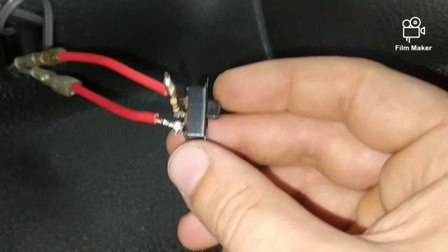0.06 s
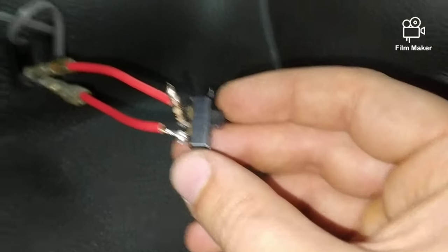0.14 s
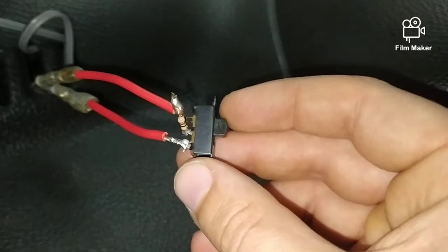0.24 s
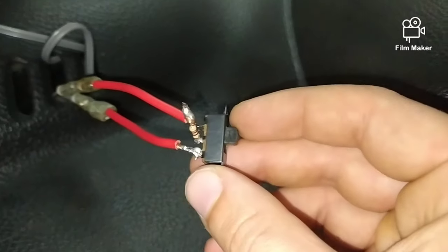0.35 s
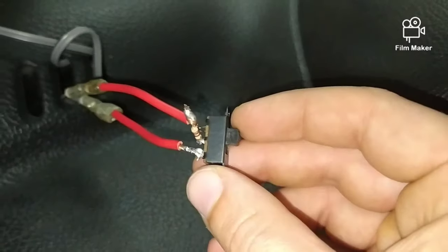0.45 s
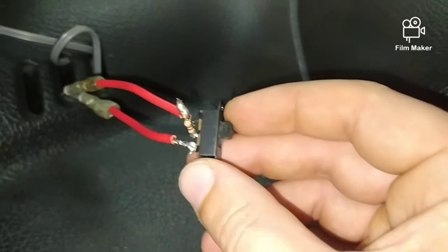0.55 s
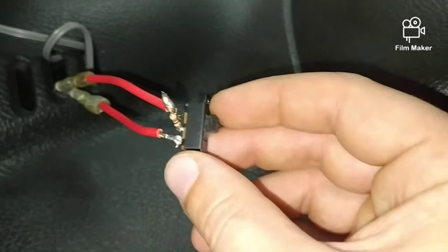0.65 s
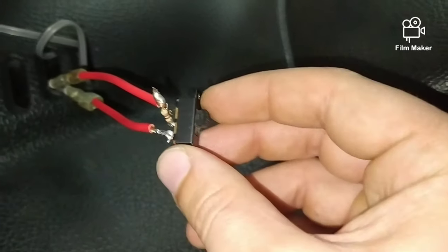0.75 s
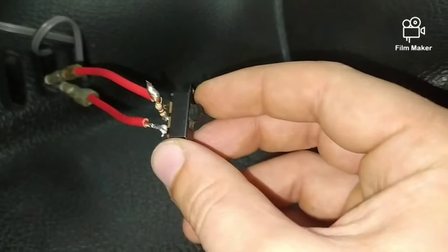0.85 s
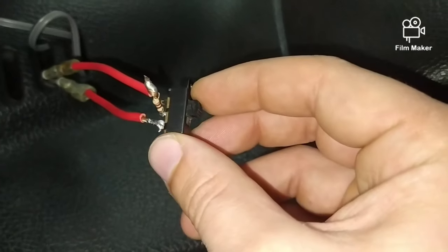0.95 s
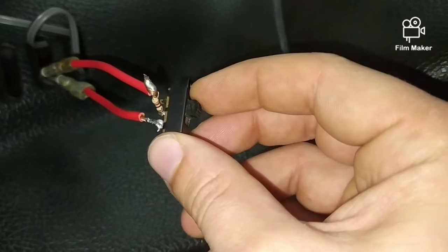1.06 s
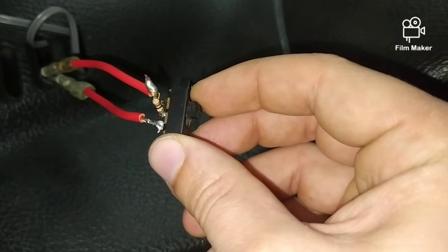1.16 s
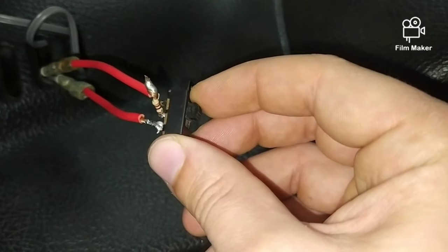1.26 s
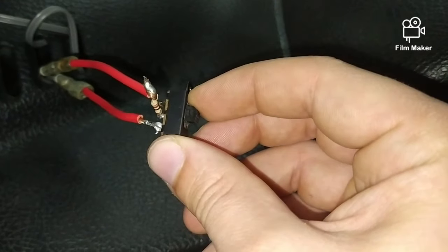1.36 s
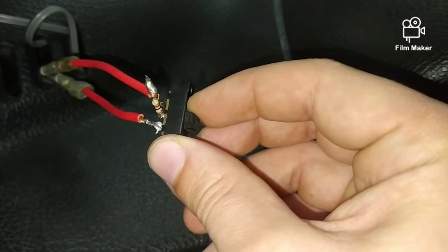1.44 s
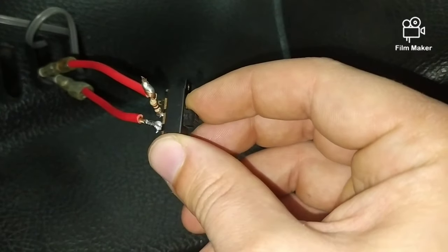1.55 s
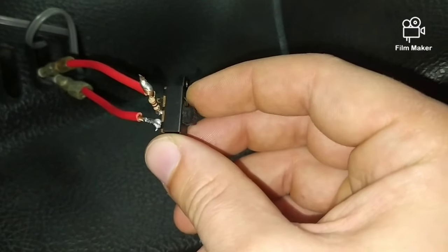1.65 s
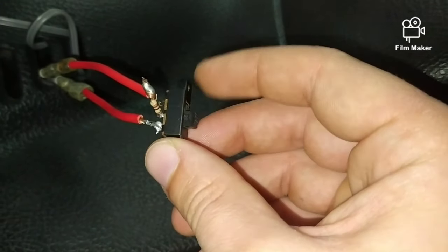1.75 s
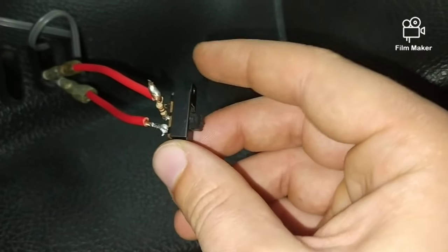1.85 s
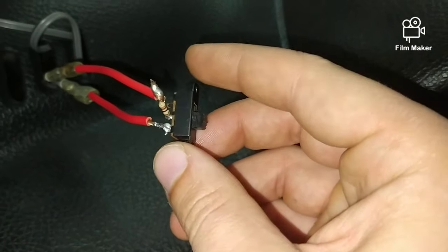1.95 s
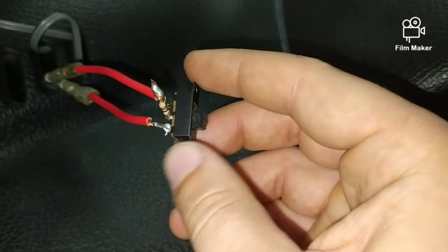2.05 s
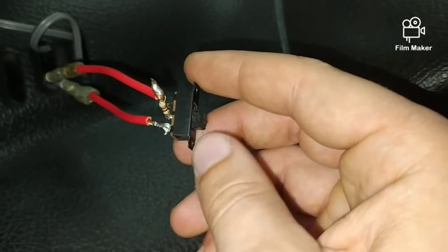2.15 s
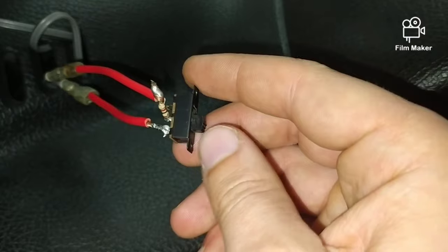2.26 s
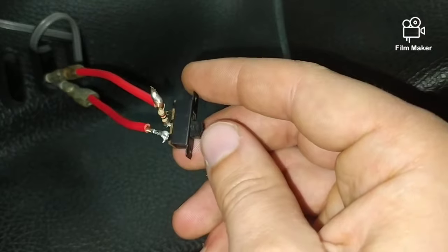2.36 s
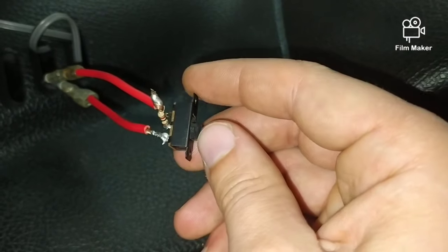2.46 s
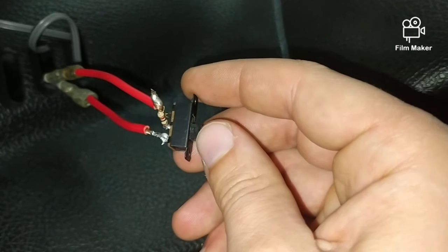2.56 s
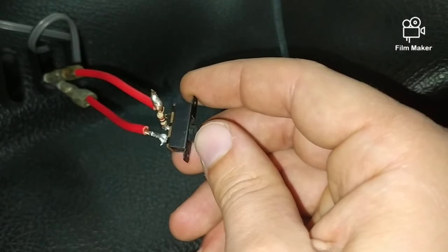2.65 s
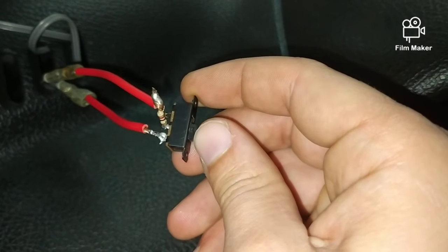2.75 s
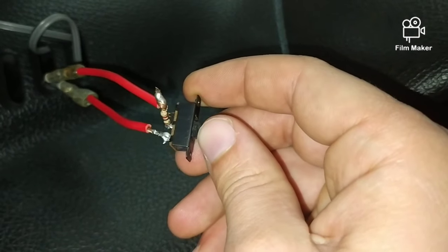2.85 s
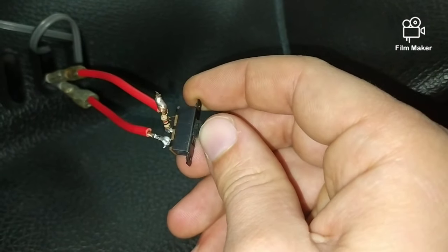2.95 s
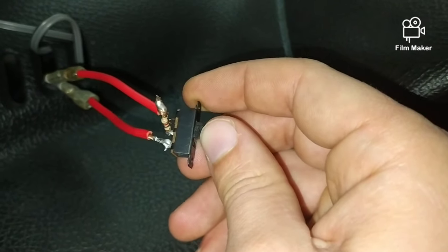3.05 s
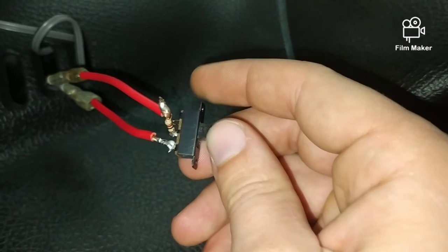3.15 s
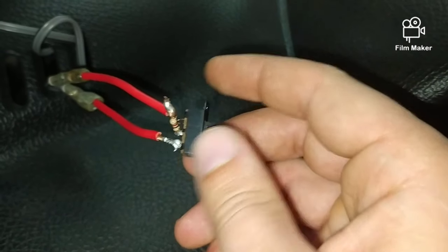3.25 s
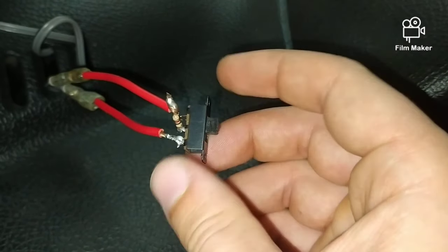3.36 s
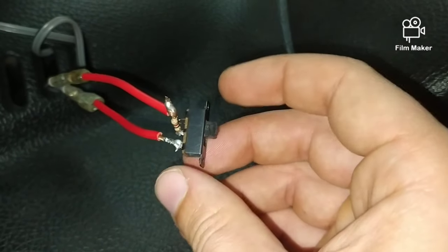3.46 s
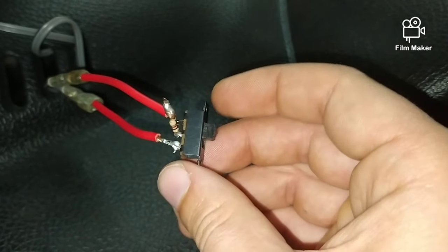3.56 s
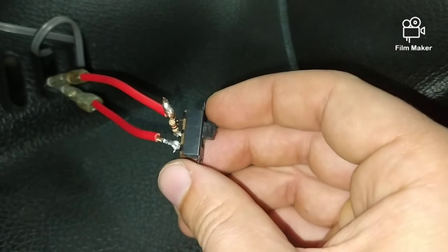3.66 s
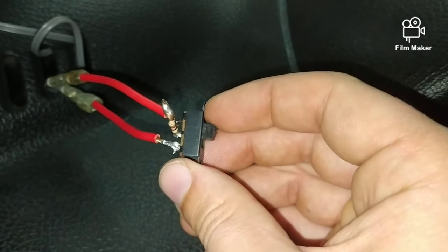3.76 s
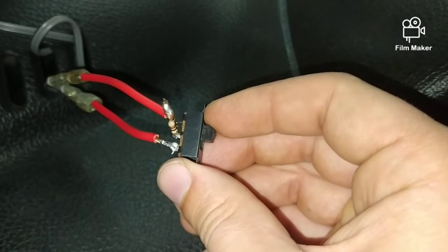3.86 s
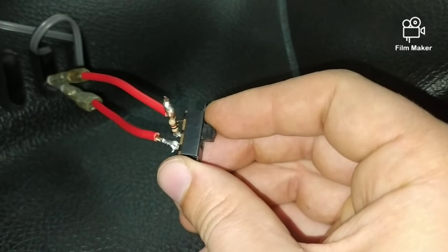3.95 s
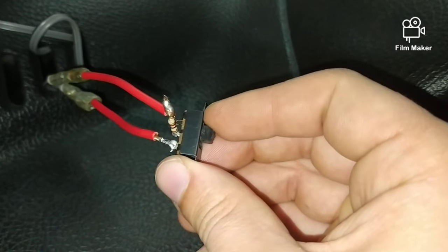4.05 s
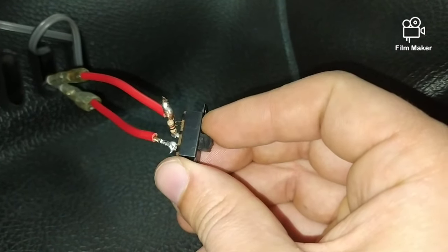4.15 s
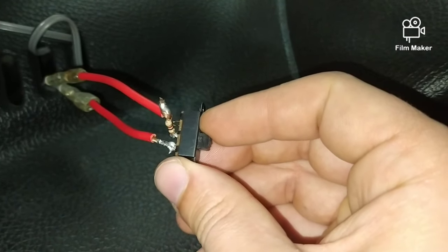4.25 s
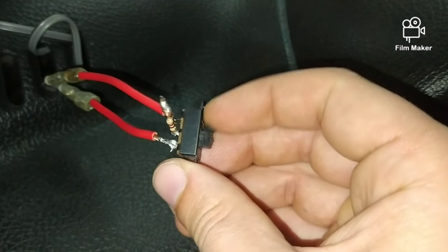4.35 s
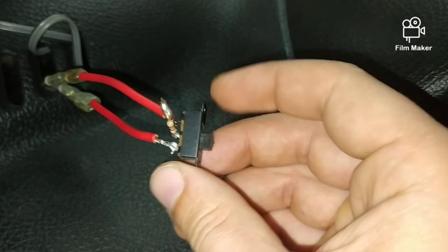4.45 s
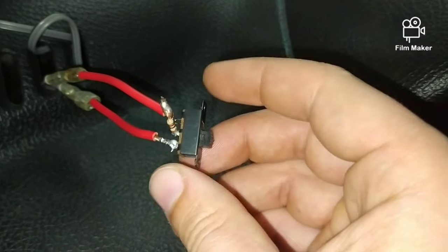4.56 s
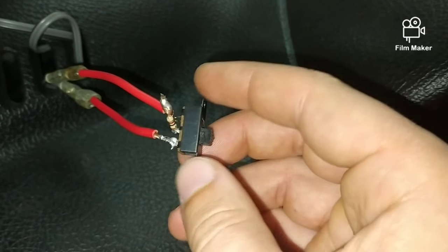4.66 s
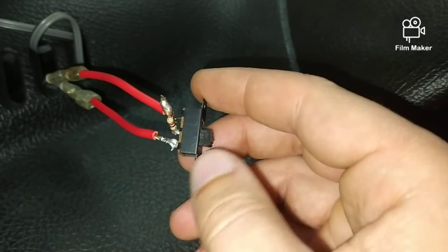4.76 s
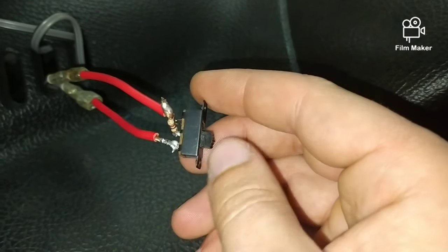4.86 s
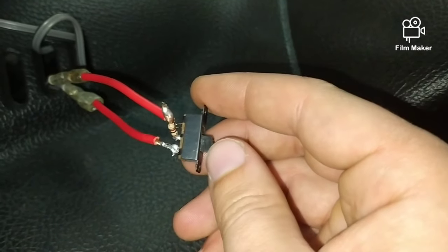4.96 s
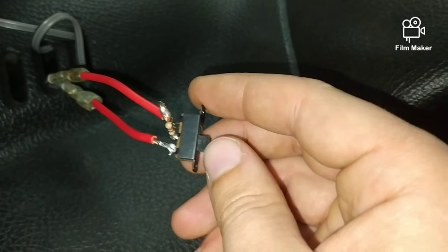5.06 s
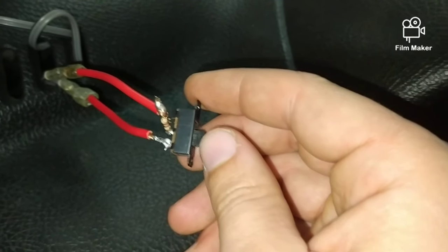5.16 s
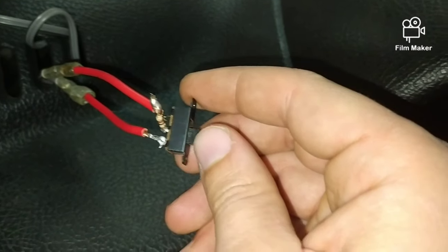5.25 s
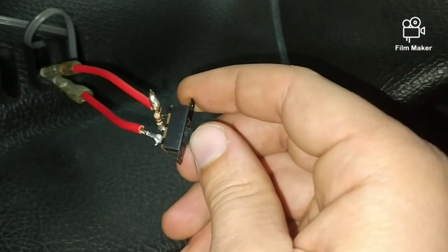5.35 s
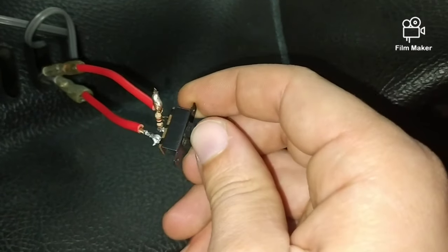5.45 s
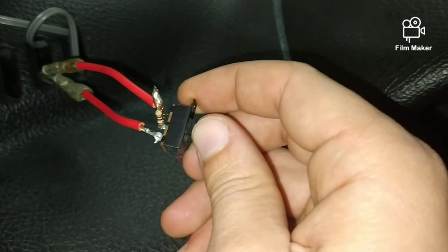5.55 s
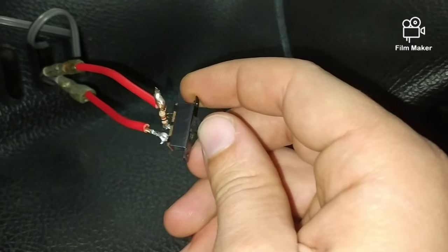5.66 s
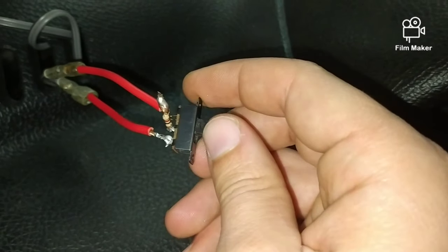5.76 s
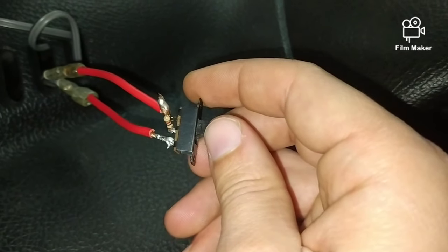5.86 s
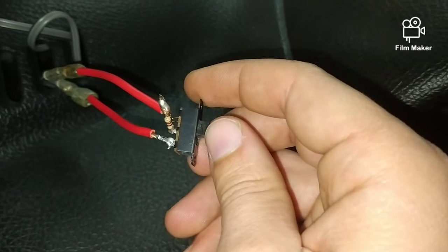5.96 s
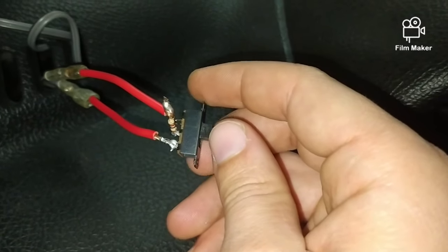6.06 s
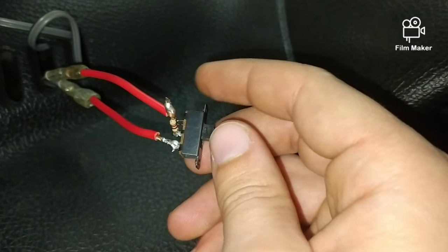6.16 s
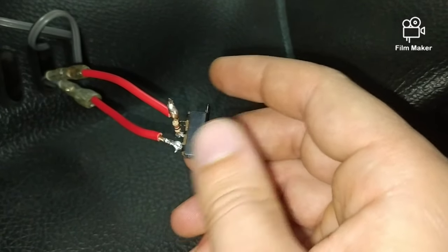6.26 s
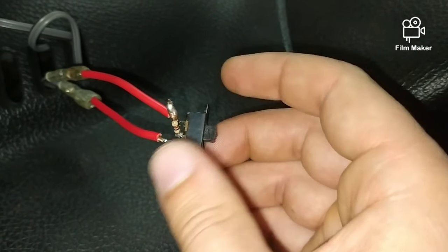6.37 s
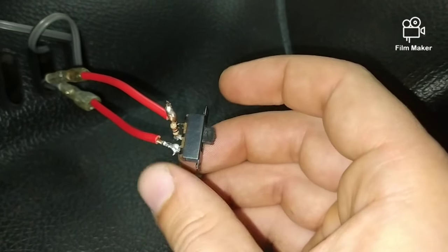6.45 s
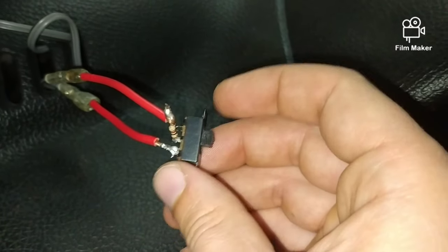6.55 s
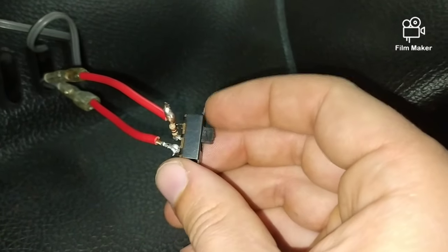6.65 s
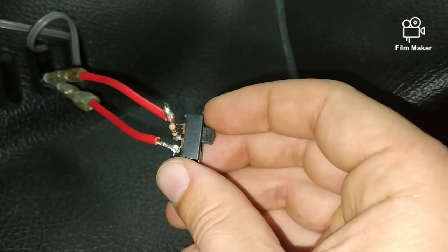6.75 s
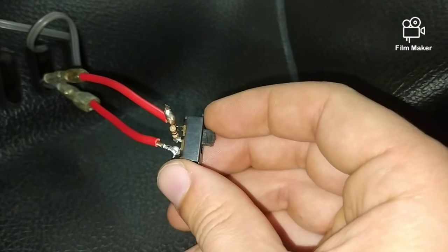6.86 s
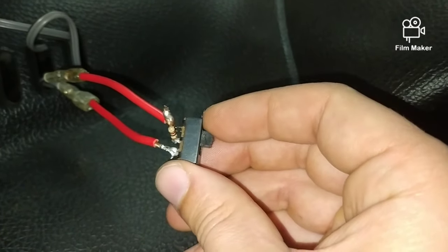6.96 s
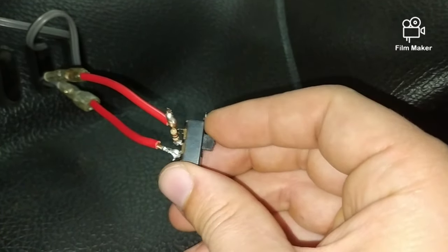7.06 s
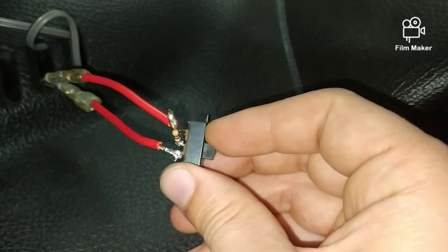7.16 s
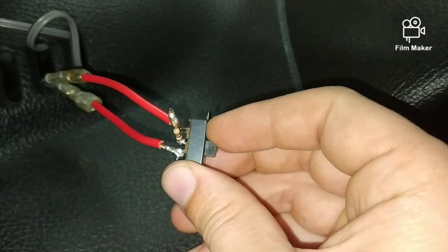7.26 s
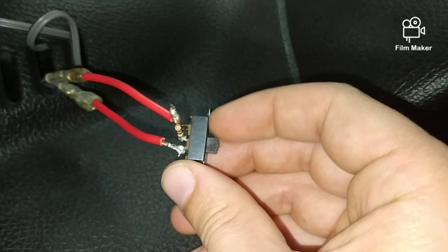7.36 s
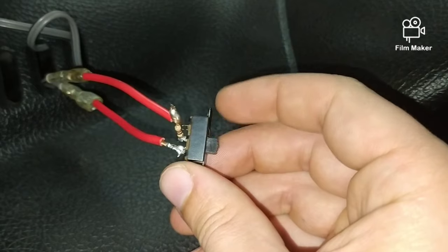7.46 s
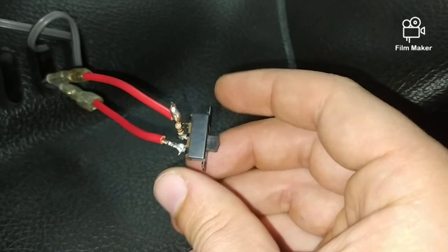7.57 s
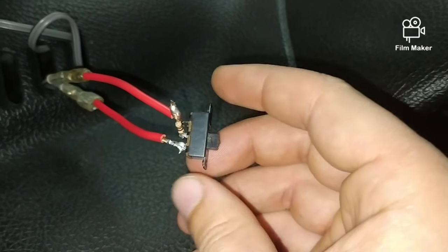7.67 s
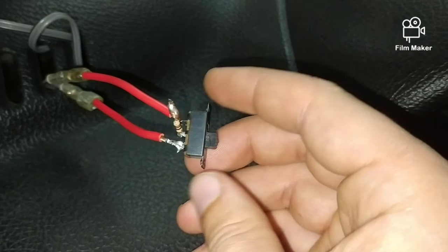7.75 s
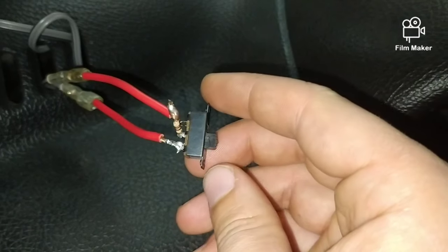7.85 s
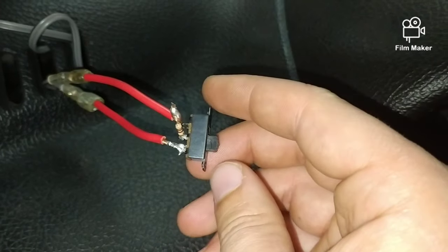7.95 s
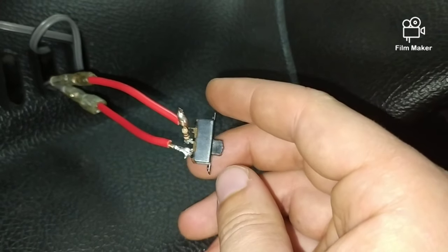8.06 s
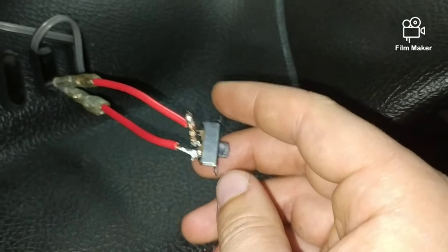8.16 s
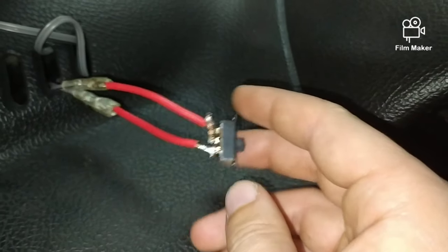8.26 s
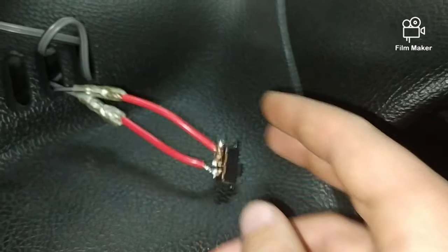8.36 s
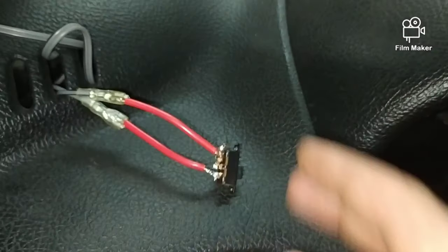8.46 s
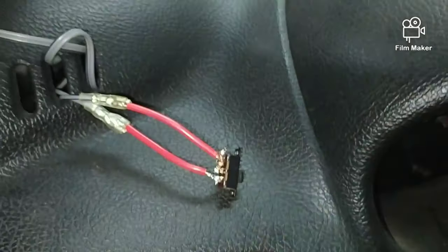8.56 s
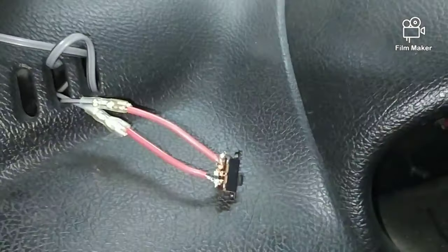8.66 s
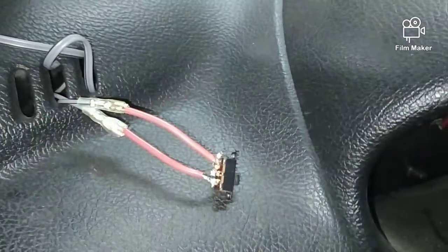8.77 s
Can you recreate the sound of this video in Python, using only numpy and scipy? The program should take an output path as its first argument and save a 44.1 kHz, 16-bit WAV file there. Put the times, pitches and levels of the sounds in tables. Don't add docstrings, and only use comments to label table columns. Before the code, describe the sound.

A small slide switch snaps back and forth close up, with faint sleeve rustle and crickets, before dropping with a knock against hollow plastic trim.

```python
import sys
import numpy as np
from scipy import signal
from scipy.fft import rfft, irfft, next_fast_len
from scipy.io import wavfile
from scipy.ndimage import uniform_filter1d

SR = 44100
rng = np.random.default_rng(int(sys.argv[2]) if len(sys.argv) > 2 else 0)


def inscribe(sig):
    pcm = np.round(np.clip(np.atleast_2d(sig).T, -1, 1) * 32767)
    wavfile.write(sys.argv[1], SR, pcm.astype(np.int16))


def gain_from_db(level_db):
    decades = np.asarray(level_db, float) / 20
    return 10 ** decades


N = 388521
SIDES = np.array([[1], [-1]])
BLOW_T = np.arange(8192) / SR
LEAD_S = 0.006
SEAT_PAN_DB, SKIN_PAN_DB = -1, -10


def shape(x, gain):
    n = next_fast_len(x.shape[-1], real=True)
    hz = np.maximum(np.arange(n // 2 + 1) * SR / n, 1)
    return irfft(rfft(x, n) * gain(hz), n)[..., :x.shape[-1]]


def colour(table):
    f, db = np.transpose(table)
    return lambda hz: gain_from_db(np.interp(np.log(hz), np.log(f), db))


def peak(centre_hz, width_hz):
    return lambda hz: 1 / (1 + 1j * (hz ** 2 - centre_hz ** 2) / (hz * width_hz))


def causal(gain):
    def with_phase(hz):
        ceps = irfft(np.log(gain(hz)))
        ceps[1:len(hz) - 1] *= 2
        ceps[len(hz):] = 0
        return np.exp(rfft(ceps))
    return with_phase


def unit(x):
    return x / np.sqrt(np.mean(x ** 2, axis=-1, keepdims=True))


def stereo_noise():
    return rng.standard_normal((2, N))


def walk(rate_hz):
    return unit(shape(stereo_noise(), lambda hz: 1 / (1 + (hz / rate_hz) ** 2)))


def gesture(s, rise_s, hold_s, fade_db_s):
    power, i = np.zeros(N), int(s * SR)
    late = np.arange(min(N - i, 2 * SR)) / SR
    rise = np.sin(np.pi / 2 * np.minimum(late / rise_s, 1)) ** 4
    fade = gain_from_db(-2 * fade_db_s * np.maximum(late - rise_s - hold_s, 0))
    power[i:i + len(late)] = rise * fade
    return power


# (pitch [Hz], level [dB per Hz])
HISS_COLOUR = [(12, 6.5), (25, 3), (82, -10), (230, -16.5), (800, -23.5), (2600, -28), (3200, -31.5),
               (5400, -33.5), (10700, -30), (11100, -40), (13000, -34.5), (13400, -41.5), (15800, -41.5),
               (16200, -78)]
# (pitch [Hz], left minus right [dB])
HISS_BALANCE = [(60, 0.5), (110, 0), (200, -1), (380, 2.5), (700, 2), (1290, -0.5), (2380, -1.5),
                (4400, -2), (8120, -2), (15000, -6.5)]
# (pitch [Hz], width [Hz], level [dB])
NIGHT_HUMPS = [(199.5, 52, -82), (320, 56, -90), (9860, 40, -91.5), (10000, 100, -91), (10460, 100, -93)]


def hiss(level_db=-65.5):
    f, pan_db = np.transpose(HISS_BALANCE)

    def port_gain(hz):
        return colour(HISS_COLOUR)(hz) * gain_from_db(SIDES * np.interp(hz, f, pan_db) / 2)

    def hump_gain(hz):
        return np.sqrt(sum((gain_from_db(db) * unit(abs(peak(f, w)(hz)) ** 2)) ** 2 for f, w, db in NIGHT_HUMPS))

    floor = shape(stereo_noise(), port_gain)
    floor = floor / np.sqrt(np.mean(floor ** 2)) * gain_from_db(level_db)
    return floor + shape(stereo_noise(), hump_gain)


# (pitch [Hz], width [Hz], level [dB])
WING_TONES = [
    (4430, 110, -1),
    (4544, 90, 2.5),
]
# (time [s], level [dB])
CHORUS_LEVEL = [(0, -77), (1.1, -82), (1.7, -81.5), (3.2, -82), (6, -82), (8.81, -82.5)]


def crickets(strokes_hz=43, depth=0.22, pan_db=-11):
    chirp_s, first_chirp_s, chirp_share = 0.458, 0.27, 0.58
    gap_db, edge, scatter_db = -13.5, 0.38, 0.93
    song = 0
    for f, w, db in WING_TONES:
        song = song + gain_from_db(db) * unit(shape(stereo_noise(), lambda hz: peak(f, w)(hz) ** 2))
    stroke_phase = np.cumsum(strokes_hz * (1 + 0.15 * walk(5.7)[0])) / SR
    throb = 1 + depth * np.sin(2 * np.pi * stroke_phase)
    t = np.arange(N) / SR
    beat = np.cos(2 * np.pi * (t - first_chirp_s) / chirp_s) - np.cos(np.pi * chirp_share)
    swell_db = gap_db / (1 + np.exp(beat / edge)) + scatter_db * walk(2.0)[0]
    swell_db = swell_db + np.interp(t, *np.transpose(CHORUS_LEVEL))
    return unit(song) * throb * gain_from_db(swell_db + SIDES * pan_db / 2)


REST_LEVEL = (-81.5, -83, -92, -91, -89)
STROKE_SHARE = (-23.5, -6.5, -7.5, -1.5, -2.5)
# (time [s], level [dB], rise [s], fade [dB per s], brightness [dB])
SLEEVE_STROKES = [(.645, -78, 0.023, 60, -1.5), (1.595, -64.5, 0.026, 68, -5.5),
                  (2.565, -75.5, 0.018, 39, -3), (2.915, -68, 0.02, 120, -4), (3.01, -66.5, 0.029, 77, -7),
                  (3.215, -75.5, 0.012, 80, -1), (4.244, -64, 0.028, 72.5, -5.5),
                  (5.579, -68.5, 0.041, 70, -4.5), (6.705, -77.5, 0.017, 62, -3.5),
                  (7.215, -64.5, 0.04, 72, -6), (8.27, -74, 0.025, 60.5, 3.5),
                  (8.324, -68, 0.043, 601.5, 10.5), (8.46, -65.5, .02, 84.5, -8.5),
                  (8.56, -74.5, 0.044, 14, 2.5)]
# (time [s], hold [s], creak level [dB], bass minus creak [dB])
SEAT_SHIFTS = [(2.774, 0.11, -65, -5), (2.99, 0.04, -70.5, -7), (3.988, .01, -76.5, 1),
               (4.172, .005, -76, 4), (5.505, .02, -74.5, 2.5), (6.567, .005, -80, -0.5),
               (6.707, .08, -74.5, -3), (6.897, 0.19, -82.5, 9), (7.136, 0.26, -68.5, 2.5),
               (7.45, .1, -82, -4), (8.224, .04, -72.5, -9.5), (8.432, 0.029, -62, -4.5),
               (8.655, .1, -71.5, 2.5)]


def movement():
    stir_db = 2 * walk(5)[[0, 0, 1, 1, 1]]
    power = gain_from_db(2 * (np.array(REST_LEVEL)[:, None] + stir_db))
    for s, db, rise_s, fade_db_s, bright_db in SLEEVE_STROKES:
        share_db = db + np.array(STROKE_SHARE) + bright_db * (np.arange(5) == 4)
        power += gain_from_db(2 * share_db)[:, None] * gesture(s, rise_s, 0.027, fade_db_s)
    for s, hold_s, db, bass_db in SEAT_SHIFTS:
        seat_db = np.array([[db + bass_db], [db]])
        power[:2] += gain_from_db(2 * seat_db) * gesture(s, 0.04, hold_s, 109)
    return power


# (pitch [Hz], width [Hz], level [dB])
PORT_RINGS = [
    (9320, 2400, 1.5),
    (8877, 700, 9.5),
]


def ports(x):
    return shape(x, lambda hz: np.array([1 + gain_from_db(db) * peak(f, w)(hz) for f, w, db in PORT_RINGS]))


# (low edge [Hz], high edge [Hz], left minus right [dB], likeness of ports [0-1],
# flicker [dB], hump pitch [Hz], hump level [dB])
CLOTH_BANDS = [
    (132, 210, 0, 0.4, 0.5, 195, 5.5),
    (237, 520, -2, 0.4, 1, 320, 3.5),
    (630, 650, -2, .2, 2.5, 900, 2),
    (1320, 1800, -10, 0, 0.5, 2120, 3),
    (4260, 6600, -8.5, .1, 0.9, 8400, -5),
]


def cloth():
    out = 0
    for power, band_settings in zip(movement(), CLOTH_BANDS):
        low_hz, high_hz, pan_db, like, flicker_db, hump_hz, hump_db = band_settings
        noise = rng.standard_normal((3, N))
        like = np.clip(like, 0, 1)
        pair = np.sqrt(like) * noise[2] + np.sqrt(1 - like) * noise[:2]

        def band_gain(hz):
            edges = 1 / np.sqrt((1 + (low_hz / hz) ** 6) * (1 + (hz / high_hz) ** 6))
            return edges * (1 + gain_from_db(hump_db) * peak(hump_hz, hump_hz / 8)(hz))

        band = ports(shape(pair, band_gain))
        band = band / np.sqrt(np.mean(band ** 2))
        out = out + band * np.sqrt(power) * gain_from_db(flicker_db * walk(29)[0] + SIDES * pan_db / 2)
    return out


# (time [s], fade [s], pitch [Hz], width [Hz], level [dB])
RESONANT_RUBS = [
    (.675, .087, 1885, 80, -75.5),
    (2.815, .12, 470, 200, -70.5),
    (2.885, 0.096, 310, 70, -61.5),
    (3.235, 0.091, 2205, 150, -73.5),
    (4.73, 0.027, 12500, 2510, -79),
    (7.93, 0.091, 49.3, 49.8, -65.5),
    (8.355, 0.033, 2500, 300, -64.5),
    (8.297, 0.018, 348, 89.6, -59),
]


def rubs():
    out = np.zeros((2, N))
    for s, fade_s, hz, width_hz, db in RESONANT_RUBS:
        low = hz < 600
        pan_db = SEAT_PAN_DB if low else SKIN_PAN_DB
        i = np.arange(int((s - 0.2) * SR), min(N, int((s + 0.5) * SR)))
        late = (i / SR - s) / fade_s
        swell = np.exp(-np.where(late < 0, 5 * late, late) ** 2)
        noise = rng.standard_normal((2, SR))
        if low:
            noise[1] = noise[0]
        tone = unit(shape(noise, lambda f: peak(hz, width_hz)(f) ** 2))[:, :len(i)]
        out[:, i] += gain_from_db(db + SIDES * pan_db / 2) * swell * tone
    return out


def burst(delay_s, tau_s):
    late = BLOW_T - LEAD_S - delay_s
    return rng.standard_normal((2, len(BLOW_T))) * (BLOW_T >= LEAD_S + delay_s) * np.exp(-np.maximum(late, 0) / tau_s)


def add(out, s, sound, db, pan_db):
    i = int((s - LEAD_S) * SR)
    part = sound[:, :N - i] / np.sqrt(np.sum(sound ** 2, axis=-1, keepdims=True) / 25)
    out[:, i:i + part.shape[1]] += part * gain_from_db(db + SIDES * pan_db / 2)


# (time [s], energy level [dB], pitch [Hz], left minus right [dB], brightness [dB])
FINGER_TICKS = [(0.994, -59.5, 563, -1, -5), (1.329, -65, 795, -4, -22), (2.225, -60, 370, 1, -17),
                (2.652, -63, 700, -1.5, -7), (2.724, -65, 393, 3, -13), (3.194, -61, 775, -1.0, -19),
                (3.931, -57.5, 772, -1, -24), (4.031, -62.5, 385, -8, -21), (5.417, -59, 800, 0, -15),
                (6.579, -61.5, 301, -1, -18), (6.719, -64, 364, -7, -16), (7.029, -65, 770, 6, -15),
                (8.253, -56.5, 297, -3, -22), (8.295, -61, 363, -6, -13)]


def fingers():
    out = np.zeros((2, N))
    for s, db, hz, pan_db, bright_db in FINGER_TICKS:
        dull = unit(shape(burst(0, 0.0064), lambda f: peak(hz, 600)(f) ** 2))
        edge = unit(shape(burst(0, 0.0015), lambda f: peak(2200, 2600)(f) ** 2))
        add(out, s, dull + gain_from_db(bright_db) * edge, db + 7.5, pan_db)
    return out


# (time [s], hold [s], level [dB])
CUFF_DRAGS = [
    (1.08, .3, -85.5),
    (4.501, 0.59, -82.5),
    (7.867, 0.37, -77.5),
]


def cuff():
    power = sum(gain_from_db(2 * db) * gesture(s, 0.044, hold_s, 84.4) for s, hold_s, db in CUFF_DRAGS)
    whisper = unit(shape(stereo_noise(), lambda hz: peak(2037, 790)(hz) ** 2))
    return whisper * np.sqrt(power) * gain_from_db(1.5 * walk(8)[0] + SIDES * SKIN_PAN_DB / 2)


def strike(delay_s, count, spread_s):
    out = np.zeros((2, len(BLOW_T)))
    when = np.cumsum(rng.random((2, count)) * spread_s, axis=1)
    for side in range(2):
        at = ((LEAD_S + delay_s + when[side]) * SR).astype(int)
        out[side, at] = 0.7 ** np.arange(count) * rng.choice([-1, 1], count)
    return out


def ring(modes, shorten):
    t, out = np.maximum(BLOW_T - LEAD_S, 0), 0
    for hz, db, t60 in modes:
        chance = rng.standard_normal(3)
        phase = 3 * chance[0] + SIDES * chance[1] * (hz / 1800) ** 2
        decay = np.exp(-np.log(1000) * t / (t60 * shorten))
        out = out + gain_from_db(db + SIDES * 2 * chance[2]) * np.sin(2 * np.pi * hz * t + phase) * decay
    return out * np.minimum(t / 0.00038, 1)


# (delay [s], level [dB])
CAB_ECHOES = [(.001, 1), (.003, -8.5), (.006, -17), (.009, -17), (0.012, -17.5), (0.016, -25.5),
              (0.02, -32), (.04, -48), (.12, -61.5)]


def cab(wet_db, lumpy_db):
    delay, db = np.transpose(CAB_ECHOES)
    chance = rng.standard_normal((2, 2, len(BLOW_T)))
    echoes = chance[0] * gain_from_db(lumpy_db * unit(uniform_filter1d(chance[1], size=24)))
    return echoes * gain_from_db(np.interp(BLOW_T - LEAD_S, delay, db, left=-120, right=-120) + wet_db)


# (pitch [Hz], level [dB per Hz])
SNAP_COLOUR = [(530, -62.5), (900, -37.5), (2160, -20.5), (3430, -26), (4490, -10), (6310, -3.5),
               (7850, -1), (8870, 0), (10400, -2), (12900, -13), (14400, -6.5), (15900, -19), (16500, -31)]
# (pitch [Hz], level [dB], time to fall 60 dB [s])
CASE_MODES = [(5500, -15, 0.097), (8200, -6.5, 0.3), (8670, 4, 0.047), (8500, 0.5, 0.26),
              (10380, -11, 0.064), (10660, -3, 0.05), (11100, -11.5, 0.043), (11654, -11, 0.037),
              (12400, -19, 0.083), (15120, -15.5, 0.063)]
# (time [s], level [dB], thud [dB], lower treble [dB], echo [dB])
SWITCH_SNAPS = [
    (1.458, -11, -29, -1.5, -4.5),
    (2.945, -15.5, -30.5, -5, -13),
    (4.169, -10.5, -33, 1.5, -9.5),
    (5.505, -14.5, -31, -3, -13.5),
    (7.161, -9, -36, 1, -9),
]


def switch():
    def thud_gain(hz):
        return peak(370, 200)(hz) ** 2 + gain_from_db(-3) * peak(180, 120)(hz) ** 2 + gain_from_db(-10) * peak(800, 400)(hz) ** 2

    out = np.zeros((2, N))
    for s, db, thud_db, low_db, echo_db in SWITCH_SNAPS:
        slip = gain_from_db(-34) * burst(0.0001, 0.001)
        blow = slip + strike(0.0006, count=5, spread_s=0.00032)
        blow = blow + gain_from_db(-12.5) * ports(blow) + gain_from_db(-6.5) * ports(cab(echo_db, 3))
        grip = colour([(6000, low_db), (8000, 0)])
        blow = unit(shape(blow, causal(lambda hz: colour(SNAP_COLOUR)(hz) * grip(hz))))
        blow = blow + gain_from_db(-20.5) * unit(ring(CASE_MODES, 0.36))
        thud = unit(shape(burst(0.0028, 0.0092), thud_gain)[:1])
        clack = unit(shape(burst(0.0011, 0.006), lambda hz: peak(1800, 2400)(hz) ** 2))
        add(out, s, blow + gain_from_db(thud_db + 1.5) * thud + gain_from_db(low_db - 25.5) * clack, db, -3.5)
    return out


def afterglow(level_db=-53.5, fade_db_s=90.5):
    power = sum(gain_from_db(2 * (db + level_db)) * gesture(s, 0.03, 0.02, fade_db_s) for s, db, *_ in SWITCH_SNAPS)
    glow = ports(shape(stereo_noise(), lambda hz: peak(8600, 4500)(hz) ** 2))
    return glow * np.sqrt(power / np.mean(glow ** 2))


# (pitch [Hz], level [dB per Hz])
CRACK_COLOUR = [(120, -36.5), (200, -21), (612, 1), (1100, -11.5), (2650, -1), (3760, -11.5), (7140, -26),
                (9230, -18.5), (14300, -57), (16000, -66.5)]
# (pitch [Hz], level [dB], time to fall 60 dB [s])
TRIM_MODES = [(340, -15, 0.099), (660, -2, 0.082), (1796, 6.5, 0.07), (2110, -11, 0.11),
              (2590, 13.5, 0.045), (3220, -20, 0.051), (3530, -25, 0.056), (3800, -19.5, 0.056),
              (4380, -8.5, 0.0655), (4600, 3, 0.03), (498, 6.5, .08)]
# (time [s], energy level [dB], left minus right [dB])
TRIM_KNOCK = [
    (8.44, -15.5, -4),
]


def trim():
    out = np.zeros((2, N))
    for s, db, pan_db in TRIM_KNOCK:
        blow = strike(0.00035, count=5, spread_s=0.00071) + cab(-0.5, 5.8)
        bass = shape(blow[:1] - blow, lambda hz: 1 / (1 + (hz / 900) ** 4))
        crack = unit(shape(blow + bass, causal(colour(CRACK_COLOUR))))
        boom = unit(shape(burst(0.0021, 0.017), lambda hz: peak(260, 250)(hz) ** 2)[:1])
        knock = gain_from_db(2.5) * crack + unit(ring(TRIM_MODES, 0.74)) + gain_from_db(-7.5) * boom
        knock = shape(knock, causal(lambda hz: 1 / (1 + (140 / hz) ** 3)))
        add(out, s, knock, db, pan_db)
    return out


def scene():
    return hiss() + crickets() + cloth() + rubs() + fingers() + cuff() + switch() + afterglow() + trim()


def top_cut(x):
    return signal.sosfilt(signal.butter(12, 16840, fs=SR, output="sos"), x)


def record(dry):
    mix = shape(dry, lambda hz: 1 / (1 + (hz / 16500) ** 80))
    return top_cut(mix)


dry = scene()
out = record(dry)
inscribe(out)
```